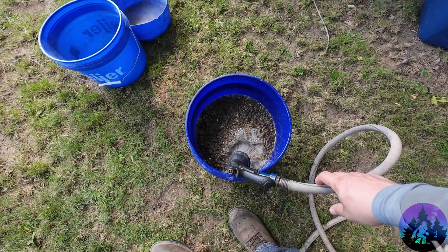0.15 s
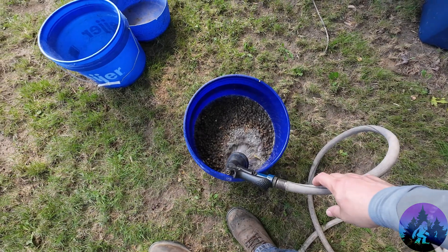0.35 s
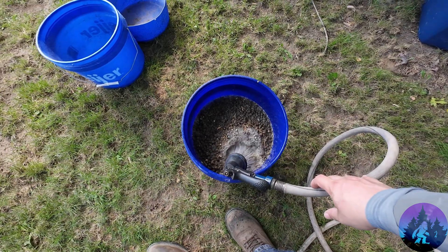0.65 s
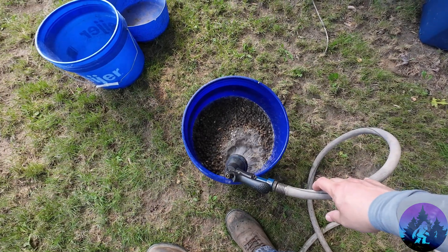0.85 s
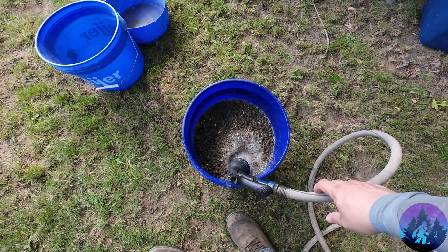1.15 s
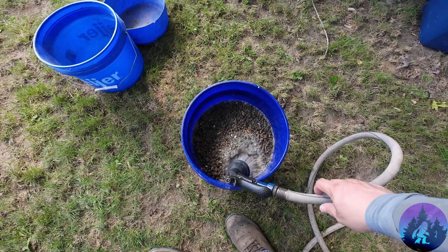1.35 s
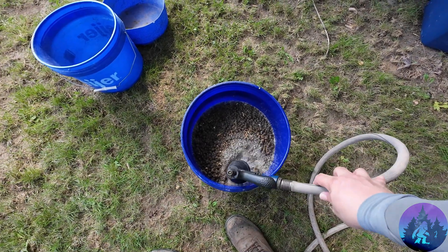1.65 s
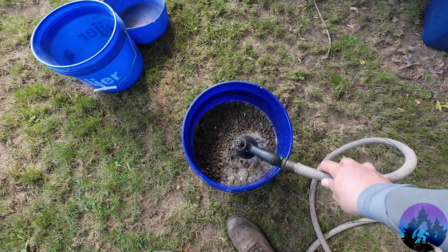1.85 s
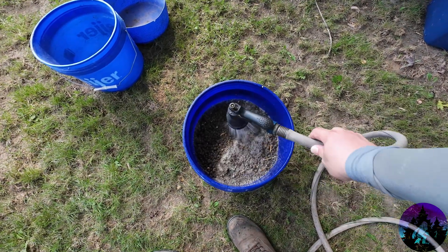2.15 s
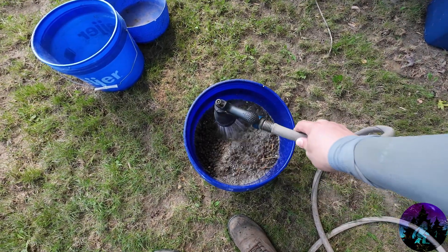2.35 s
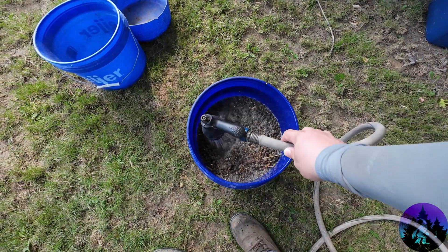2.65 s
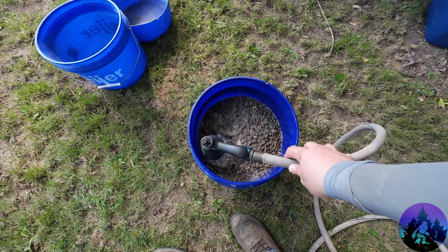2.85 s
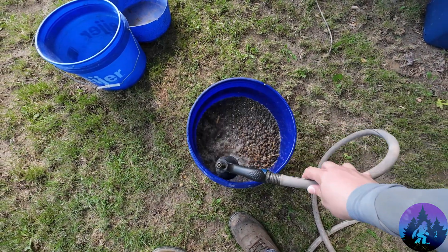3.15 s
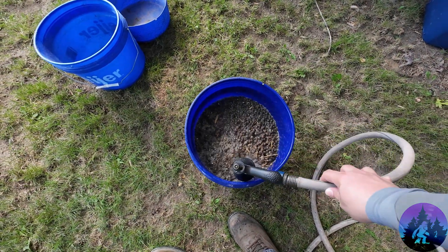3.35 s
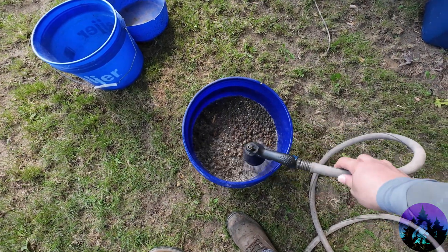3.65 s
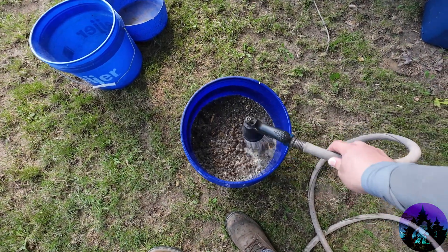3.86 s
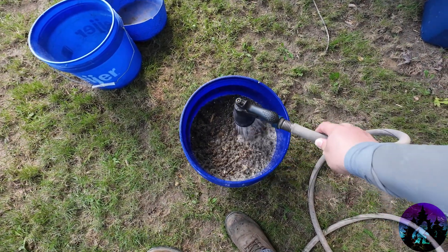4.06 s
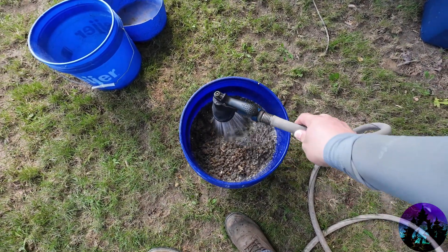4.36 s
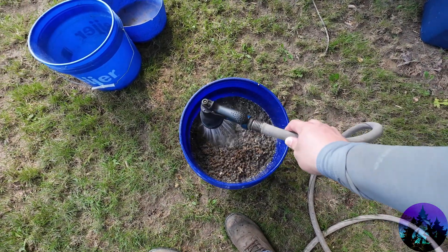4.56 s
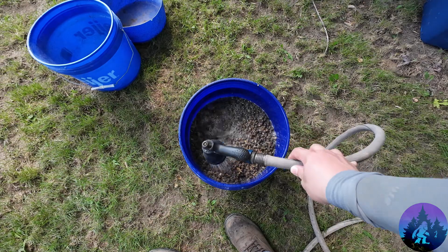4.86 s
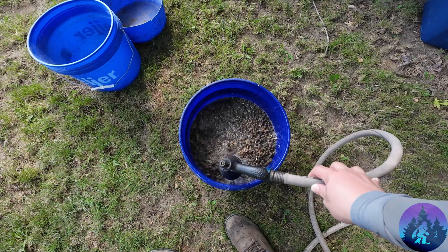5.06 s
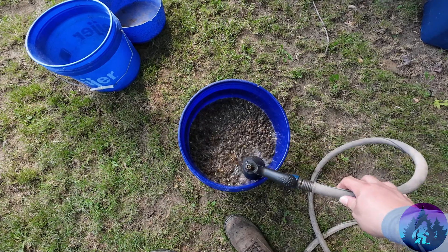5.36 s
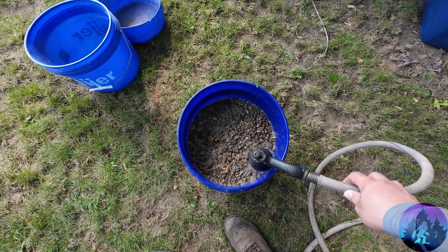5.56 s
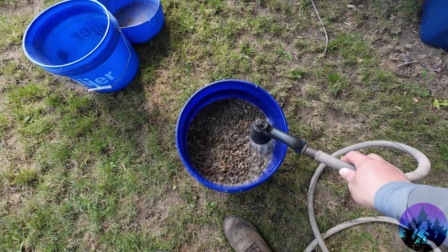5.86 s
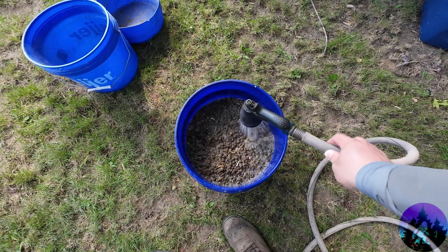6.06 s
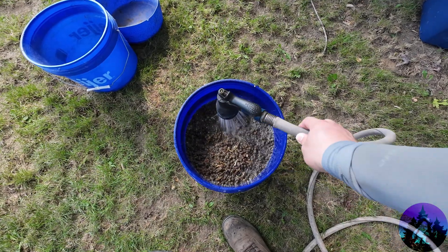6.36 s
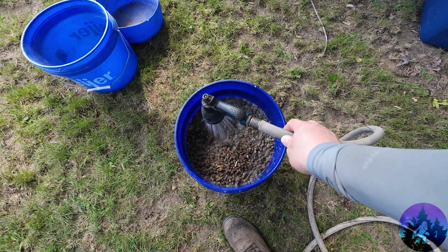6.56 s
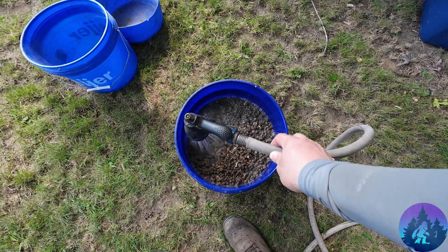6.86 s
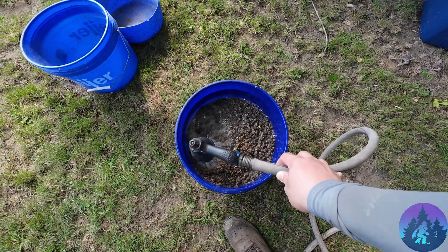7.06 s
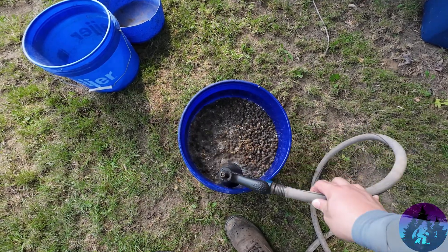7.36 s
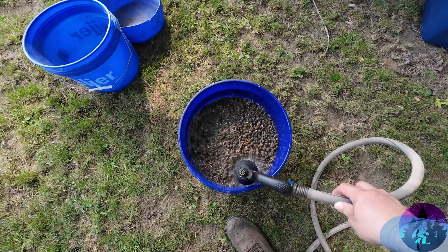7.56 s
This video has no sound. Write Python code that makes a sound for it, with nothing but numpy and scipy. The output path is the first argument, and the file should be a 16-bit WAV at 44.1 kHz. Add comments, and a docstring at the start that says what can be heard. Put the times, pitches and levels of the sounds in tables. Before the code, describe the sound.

From the start to the end, nearly eight seconds, a garden hose nozzle sprays water into a plastic bucket of wet manure, heard from close above, outdoors. A bright, sputtering hiss blends with dense spattering drops and lower churning. The spray swells and sinks gently about every three quarters of a second. The bucket adds a hollow ring that shifts as the nozzle circles, sounding less deep around 2.3, 4.2 and 6.3 seconds. Wind puffs on the microphone lightly at about 0.5 to 1.5 seconds and again near 2 and 3 seconds. From about 4 to 5.8 seconds it buffets harder, with low thumps jumping between left and right, strongest near 4.8 seconds. A few smaller gusts return between 6.6 and 7.5 seconds. A faint, steady distant rumble lies underneath.

```python
"""Hosing out a bucket

A garden hose nozzle is swept round inside a plastic bucket of wet manure on a lawn, heard from above.
The spray swells and sinks, hisses and splashes. Its drops make the air in the bucket ring, at pitches
whose strength depends on where the nozzle is. Wind buffets the microphone's two openings (ports)
separately, over a faint distant rumble."""
import sys
import numpy as np
from scipy import signal
from scipy.fft import rfft, irfft, next_fast_len
from scipy.io import wavfile
from scipy.ndimage import uniform_filter1d

SR = 44100
rng = np.random.default_rng(int(sys.argv[2]) if len(sys.argv) > 2 else 0)


def to_wav(sig):
    """Store sig (one row per channel, or 1-D mono) as 16-bit WAV at the path in sys.argv[1].

    Samples outside -1..1 are clipped; the rate is SR.
    """
    pcm = np.clip(np.atleast_2d(sig), -1, 1) * 32767
    pcm = np.round(pcm).astype(np.int16)
    wavfile.write(sys.argv[1], SR, pcm.T)  # frames by channels


N = 340452
TIME = np.arange(N) / SR
SIZE = next_fast_len(N)
HZ = np.maximum(np.arange(SIZE // 2 + 1) * SR / SIZE, 1)   # frequency of each point of a spectrum


def from_db(db):
    """Turn decibels into a factor to multiply by."""
    return 10 ** (np.asarray(db) / 20)


def rms_one(x):
    """Scale a sound to an average strength (rms) of 1."""
    return x / np.sqrt(np.mean(x ** 2) + 1e-20)


def in_time(rows):
    """Join (time, value) points with straight lines, one value per sample."""
    return np.interp(TIME, *np.transpose(rows))


def in_pitch(rows):
    """Spread each column after the first (frequency) over the whole spectrum."""
    hz, *columns = np.transpose(rows)
    return [np.interp(np.log(HZ), np.log(hz), column) for column in columns]


def colour(x, tone):
    """Shape the lows and highs of x by a (frequency, level) table; rms 1."""
    return rms_one(irfft(rfft(x, SIZE) * from_db(in_pitch(tone)[0]), SIZE)[:N])


def drift(rate_hz):
    """A smooth random wobble of rms 1; a higher rate wobbles faster."""
    step = 20   # samples between random values
    r = np.exp(-2 * np.pi * step * rate_hz / SR)
    slow = signal.lfilter([1], [1, -2 * r, r * r], rng.standard_normal(N // step + 3002))[3000:]
    return np.interp(np.arange(N) / step, np.arange(len(slow)), rms_one(slow))


def nozzle_place():
    """The nozzle circles the rim. far: 0 near wall to 1 far wall; left: -1 right wall to 1 left wall."""
    # path from the near wall, going by the right side: t/s, angle/turns
    path = [(0, 0.19), (.7, 0.064), (1.8, 0.16), (2.1, 0.28), (2.5, 0.71), (2.8, 0.71), (3.1, 0.81),
            (3.4, 0.88), (3.78, 1.18), (4.0, 1.29), (4.4, 1.31), (4.85, 1.74), (5.2, 1.84), (5.7, 2.21),
            (6.0, 2.28), (6.45, 2.35), (7.0, 2.75), (7.72, 2.88)]
    angle = 2 * np.pi * uniform_filter1d(in_time(path), SR // 8)
    far = np.clip(.5 - 0.97 * np.cos(angle), 0, 1)
    return far, -np.sin(angle)


def follow_spray(parts, far, left):
    """A level in dB for each part: it follows the spray's swell, a little late, and the nozzle's place."""
    # the spray swells about every three quarters of a second: t/s, level/dB
    loudness = [(0.0, -26.5), (0.1, -26.5), (0.45, -29.5), (0.64, -25.5), (0.79, -26.5), (1.22, -29),
                (1.46, -25.5), (1.93, -30.5), (2.22, -24.5), (2.38, -25.5), (2.77, -28.5), (2.97, -25.5),
                (3.44, -31.5), (3.76, -26.5), (4.24, -29), (4.45, -24.5), (4.69, -25), (4.99, -30),
                (5.2, -26.5), (5.33, -27), (5.55, -28.5), (5.75, -30), (5.9, -26), (6.12, -24.5),
                (6.53, -27.5), (6.79, -23), (7.33, -30), (7.62, -25.5), (7.72, -30)]
    swell_db = uniform_filter1d(in_time(loudness), SR // 12) + 27   # swings around zero
    levels = []
    for db, share, lag_s, far_db, left_db in parts:
        late_db = swell_db[np.clip(np.arange(N) - int(lag_s * SR), 0, N - 1)]
        levels.append(db + share * late_db + far_db * far + left_db * left)
    return np.array(levels)


def drops(per_s, spread_db):
    """A dense hail of tiny drop impacts of uneven size; rms 1."""
    sizes = from_db(spread_db * np.minimum(rng.exponential(1, N), 4)) * rng.standard_normal(N)
    return rms_one(sizes * (rng.random(N) < per_s / SR))


def sputter(x, low_hz, high_hz, bands, shared, own_db):
    """The spray sputters: all frequency bands flicker together, and each a little on its own."""
    spectrum, out = rfft(x, SIZE), 0
    place = np.clip(np.log(HZ / low_hz) / np.log(high_hz / low_hz), 0, 1) * (bands - 1)
    together_db = shared * (0.29 * drift(7.1) + 0.24 * drift(37))
    for k in range(bands):
        band = irfft(spectrum * np.clip(1 - abs(place - k), 0, 1), SIZE)[:N]
        out = out + band * from_db(together_db + own_db * drift(18.5))
    return rms_one(out)


def spray(hiss_db, spatter_db, splash_db, rings_db):
    """The jet hisses, its drops spatter and splash, and the water below churns."""
    # the jet, through the dip and peak of the microphone's housing: f/Hz, relative level/dB
    hiss_tone = [(7500, -40), (8500, -13), (9100, -8), (10100, -6), (11000, -9), (12250, -13.5),
                 (12600, -11), (12950, -2.5), (13400, -1), (14000, -2.5), (14500, -5), (15000, -8),
                 (15700, -12)]
    # bright spatter of drops: f/Hz, relative level/dB
    spatter_tone = [(2240, -32.5), (3800, -0.5), (4470, 0.5), (5300, -1), (6400, 0.5), (7080, -4),
                    (7900, 1.5), (8500, -4), (9300, -13)]
    # drops landing on the heap: f/Hz, relative level/dB
    splash_tone = [(1000, -53), (1600, -9), (2000, -4), (2900, 0), (4000, -4.5), (4600, -6), (6500, -19)]
    # water churning in the heap: f/Hz, relative level/dB
    churn_tone = [(100, -44), (170, -7), (260, -7.5), (400, -1.5), (535, -1), (680, 1.5), (870, 3),
                  (1250, 0.5), (1500, -5.5), (2200, -20.5)]
    hiss = colour(drops(40000, spread_db=2.5), hiss_tone)
    hiss = sputter(hiss, 11000, 15600, bands=7, shared=1.2, own_db=0.9)
    spatter = colour(drops(30000, spread_db=1.0), spatter_tone)
    spatter = sputter(spatter, 3680, 8560, bands=8, shared=.5, own_db=1.17)
    splash = colour(drops(18000, spread_db=2.0), splash_tone)
    splash = sputter(splash, 1580, 4050, bands=8, shared=1.0, own_db=1.4)
    churn = colour(drops(8000, spread_db=2.5), churn_tone)
    churn = sputter(churn, 195, 1200, bands=6, shared=0.2, own_db=2.5)
    churn_db = -39 + 0.53 * (rings_db.mean(axis=0) + 43.5)   # swells with the bucket's low ringing
    return (from_db(hiss_db + 1.47) * hiss + from_db(spatter_db + 1.06) * spatter
            + from_db(splash_db - 0.34) * splash + from_db(churn_db) * churn)


def ring(x, hz, width_hz):
    """Make x ring at one pitch; a narrower width rings longer; rms 1."""
    r = np.exp(-np.pi * width_hz / SR)
    return rms_one(signal.lfilter([1, 0, -1], [1, -2 * r * np.cos(2 * np.pi * hz / SR), r * r], x))


def low_ring_levels(far, left):
    """Levels in dB of the bucket's three low pitches; the lowest weakens as the bucket fills."""
    # lowest first: level/dB, share of the swell, lag/s, gain at far wall/dB, gain at left wall/dB
    ring_parts = [(-38.5, 1.54, 0.023, -8, -0.37), (-49, 1.8, 0.022, 9, -0.81),
                  (-35, 1.14, 0.017, -8, -0.85)]
    fade_db_per_s = .5
    rings_db = follow_spray(ring_parts, far, left)
    rings_db[0] -= fade_db_per_s * (TIME - N / SR / 2)
    return rings_db


def bucket(splash_db, rings_db, far):
    """Drops make the bucket's air ring, at each pitch as strongly as the nozzle's place allows."""
    # low pitches of the air: f/Hz, base width/Hz
    low_rings = [(375, 123), (850, 250), (1170, 420)]
    # further pitches, relative to the splash: f/Hz, width/Hz, level at near wall/dB, at far wall/dB
    other_rings = [(670, 44, -18, -35.5), (1761, 84, -18, -8.5), (1795, 83, -17.5, -6.5),
                   (2078, 250, -10, -6), (2366, 420, -6, -5.5), (3020, 140, -12, -23.5),
                   (3434, 99, -11.5, -9), (3773, 69, -15, -14.5), (4140, 100, -28, -13)]
    impacts, out = drops(15000, spread_db=0.9), 0
    for db, (hz, width_hz) in zip(rings_db, low_rings):
        once = ring(impacts, hz, 1.76 * width_hz)
        out = out + from_db(db) * ring(once, hz, 1.76 * width_hz)   # twice, for a steeper-sided peak
    for k, (hz, width_hz, near_db, far_db) in enumerate(other_rings):
        level_db = splash_db + near_db + far * (far_db - near_db) + 1.1 * drift(3.5)
        out = out + (-1) ** k * from_db(level_db) * ring(impacts, hz, width_hz)
    return out


def wall_echo(x, far):
    """The echo off the bucket wall partly cancels some pitches, which depend on the nozzle's place."""
    # weakened pitches: f at near wall/Hz, f at far wall/Hz, width/Hz, depth from 0 to 1
    dips = [(532, 560, 96, 0.26), (849, 1068, 110, 0.61), (1390, 1550, 113, 0.48), (1950, 2360, 140, 0.4),
            (4370, 4550, 300, 0.37)]
    at_near, at_far = x, x
    for near_hz, far_hz, width_hz, depth in dips:
        at_near = at_near - depth * signal.lfilter(*signal.iirpeak(near_hz, near_hz / width_hz, SR), at_near)
        at_far = at_far - depth * signal.lfilter(*signal.iirpeak(far_hz, far_hz / width_hz, SR), at_far)
    return at_near + far * (at_far - at_near)


def ports(x, far, left):
    """Left and right differ a little, by the housing's shadow, arrival time and scattered sound."""
    # f/Hz, base level of scatter/dB, left minus right/dB, left's lead/radians, share of the time gap
    port_contrast = [(200, -16, 0, 0, 0), (700, -19, .6, 0, 0), (1000, -23, .3, 0, 0), (1300, -70, 0, 0, 0),
                     (3600, -70, 0, 0, 0), (4200, -22, .3, 0, .4), (5000, -15, .9, .17, 1),
                     (5800, -14, 1.1, .33, 1), (6600, -17, .4, .19, .7), (7200, -30, 0, .05, .4),
                     (9000, -14, .7, .12, 1), (10000, -13, -1.5, .04, 1.1), (12500, -13, -1.7, 0, .9),
                     (13200, -14, -1.6, 0, .8), (14000, -13, .15, -.04, .8), (15300, -14, -.6, -.18, .7)]
    scatter_db, lean_db, phase, gap_share = in_pitch(port_contrast)
    spectrum = rfft(x, SIZE)
    housing = irfft(spectrum * (lean_db * np.log(10) / 40 + .5j * phase), SIZE)[:N]
    # arriving slightly early adds the wave's slope times the time gained
    gap_s = (3 + .75 * TIME) * 1e-6 * left
    slope = irfft(spectrum * gap_share * 2j * np.pi * HZ, SIZE)[:N]
    # many weak late echoes scramble the timing but leave the tone
    echoes = rfft(rng.standard_normal(4000) * np.exp(-np.arange(4000) / 1500), SIZE)
    scattered = irfft(spectrum * from_db(scatter_db) * echoes / abs(echoes), SIZE)[:N]
    # their paths keep changing as the spray flies, so the phase wanders
    scattered = np.real(signal.hilbert(scattered, SIZE)[:N] * np.exp(3j * drift(15)))
    side = housing + gap_s / 2 * slope + from_db(-2 + 6.6 * far) * scattered
    return np.array([x + side, x - side])


def distant_rumble():
    """A steady, far-off outdoor rumble with a faint hum."""
    # f/Hz, relative level/dB
    distant_tone = [(15, -30), (25, -10), (60, -5.5), (90, -1), (115, -13), (155, -36), (210, -2),
                    (300, -15), (400, -50)]
    return from_db(-51) * colour(rng.standard_normal(N), distant_tone)


def wind_power():
    """Power of rumble and flutter at each port: the breeze wanders; each puff rises, holds and falls."""
    # breeze on the ports: t/s, base level/dB
    breeze = [(0, -79), (.35, -76), (.45, -52), (.65, -48), (.85, -74), (1.0, -43), (1.46, -44),
              (1.52, -76), (1.8, -81), (1.95, -54), (3.0, -47.5), (3.35, -54), (3.8, -47), (4.0, -41),
              (4.55, -36.5), (4.65, -35), (5.4, -39), (5.5, -38), (5.9, -41), (6.2, -56), (6.5, -45),
              (6.9, -48), (7.1, -42), (7.72, -58)]
    # puffs of wind: t/s, hold/s, base level/dB, base lean to the left/dB, flutter against rumble/dB
    puffs = [(.43, .02, -40.5, -6, -8), (.54, .02, -31.5, 6, -18), (.97, .01, -36, 9, -14),
             (1.07, .08, -32, -1, -9), (1.24, .01, -34, -1, -16), (1.37, 0.022, -40, 4, -2),
             (1.44, 0.021, -33, 7, -12), (1.91, .01, -37.5, -14, -21), (2.06, 0.0091, -30.5, -28, -25),
             (2.21, .01, -42, -16, -12), (2.73, .01, -43, -14, -19), (2.86, .03, -33, -10, -27),
             (2.99, .02, -42, 13, -16), (3.57, 0.009, -41, -4, -21), (3.8, .03, -40, 1, -22),
             (3.91, 0.083, -28.5, -13, -20), (4.11, 0.022, -31.5, -9, -18), (4.164, 0.0044, -28.5, -4, 1),
             (4.23, 0.12, -40, 8, -14), (4.471, 0.03, -27.5, -9, -2), (4.62, .05, -26, 6, -22),
             (4.71, 0.067, -20.5, -6, -11.5), (4.87, 0.011, -19, -16, -2.5), (4.92, 0.076, -26, 2, -10),
             (5.01, .01, -26, 15, -9), (5.14, 0.025, -25.5, 14, -16), (5.22, .05, -32, 6, -18),
             (5.3, 0.078, -23.5, 0.5, -11.5), (5.48, .04, -37, -2, -14), (5.63, 0.11, -29, 8, -17),
             (5.76, 0.014, -27, 9, -5), (5.87, .01, -42, -9, -13), (5.98, .01, -36, -11, -9),
             (6.13, .01, -44, -1, -14), (6.58, 0.036, -31, -15, -20), (6.74, .015, -31, -18, -6),
             (7.01, 0.035, -37, 11, -25), (7.1, .03, -38.5, -9, -14), (7.2, .03, -41, 18, -25),
             (7.35, 0.029, -26, -16, -18), (7.4, 0.012, -30, -5.5, -2.5), (7.53, 0.015, -35, 8, -24)]
    rise_db_per_s, fall_db_per_s, strong_db = 380, 330, -33
    step = 64   # samples between computed points
    t = TIME[::step]
    start, hold, db, lean_db, flutter_db = np.transpose(puffs)[:, :, None]
    shape_db = -rise_db_per_s * np.maximum(start - t, 0) - fall_db_per_s * np.maximum(t - start - hold, 0)
    flutter_db = np.minimum(flutter_db, 0) + 0.6 * shape_db   # flutter comes and goes faster
    # one row for the breeze, then one for each puff
    level_db = np.vstack([in_time(breeze)[::step], db + shape_db])
    lean_db = np.vstack([2.8 * drift(6.6)[::step], lean_db + np.zeros_like(t)])
    flutter_db = np.vstack([np.full_like(t, -9), flutter_db])
    flutter_db += 0.63 * np.minimum(level_db - strong_db, 0)   # weak gusts flutter less
    port_share = np.array([1 / (1 + from_db(-2 * pull * lean_db)) for pull in (0.85, -1.25)])
    rumble = (port_share * from_db(2 * level_db)).sum(axis=1)
    flutter = (port_share * from_db(2 * (level_db + flutter_db))).sum(axis=1)
    return [[np.interp(TIME, t, port) for port in power] for power in (rumble, flutter)]


def wind():
    """Lumpy swirls of air, separate at each port; the flutter of strong gusts is louder on the right."""
    # a light gust: f/Hz, relative level/dB
    rumble_tone = [(18, -4.5), (30, 7.5), (55, 4), (90, -0.5), (140, -16), (250, -60), (500, -80)]
    # what strong gusts add: f/Hz, relative level/dB
    flutter_tone = [(60, -14), (100, -2), (150, 2), (230, -6.5), (350, -15), (600, -28), (1000, -90)]
    rumble_power, flutter_power = wind_power()
    out = np.zeros((2, N))
    for port, bias_db in enumerate([-2.5, 1.5]):
        lumps = from_db(2.0 * drift(16.0))
        rumble = colour(rng.standard_normal(N) * lumps, rumble_tone)
        flutter = colour(rng.standard_normal(N) * lumps * from_db(4 * drift(36)), flutter_tone)
        out[port] = np.sqrt(rumble_power[port]) * rumble
        out[port] += from_db(bias_db) * np.sqrt(flutter_power[port]) * flutter
    return from_db(7) * out


def buffets():
    """Each buffet is a sharp push of air that dies away in about a cycle and a half."""
    # t/s, base level/dB, f/Hz, left minus right/dB
    pushes = [(0.423, -24, 83.4, -12), (0.52, -35, 51.1, 2.0), (1.065, -28, 59.2, -3),
              (1.363, -26, 91.5, -5), (2.186, -32, 72.7, -12), (3.916, -21, 62, -21),
              (4.12, -20.5, 87, -11), (4.246, -22, 51.5, 14), (4.343, -27, 51.1, 11.5),
              (4.468, -27, 78.1, -12.0), (4.651, -12, 50.7, -14), (4.854, -6, 52.7, 8),
              (4.924, -24, 64.6, 3.5), (5.286, -12, 51.1, 8), (5.546, -19, 75.4, 3),
              (5.679, -16, 59.2, 6.0), (6.707, -31, 83.4, -21.0), (6.746, -29, 51.1, -16),
              (7.116, -27, 67.3, -21.5), (7.194, -19.5, 64.6, 22), (7.29, -20, 68, 20)]
    out = np.zeros((2, N))
    for (start, db, hz, lean_db), sign in zip(pushes, rng.choice([-1, 1], len(pushes))):
        cycles = np.arange(int(2.5 * SR / hz)) * hz / SR
        push = sign * np.sin(2 * np.pi * cycles) * 4 * cycles * np.exp(-2.2 * cycles)
        port_gains = from_db(db - 4 + np.array([[.5], [-.5]]) * lean_db)
        at = round(start * SR)
        out[:, at:at + len(push)] += (port_gains * push)[:, :N - at]
    return out


def scene():
    """Water, wind and distant rumble together at the two ports."""
    # hiss, spatter, splash: base level/dB, share of the swell, lag/s, gain at far wall/dB, at left wall/dB
    spray_parts = [(-27, 1, .003, 0.8, 0.03), (-31, 1, 0.012, 1.1, -0.15), (-28.6, 0.8, 0.02, -0.16, 0.13)]
    far, left = nozzle_place()
    hiss_db, spatter_db, splash_db = follow_spray(spray_parts, far, left)
    rings_db = low_ring_levels(far, left)
    distant = distant_rumble()
    gusts = .45 * np.tanh((wind() + buffets()) / .45)   # the hardest gusts flatten against the port mesh
    water = spray(hiss_db, spatter_db, splash_db, rings_db) + bucket(splash_db, rings_db, far)
    return ports(wall_echo(water, far), far, left) + gusts + distant


def record(dry):
    """Cut off the very highest treble."""
    cutoff_hz = 15750
    return signal.sosfilt(signal.ellip(14, .5, 80, cutoff_hz, fs=SR, output="sos"), dry)


dry = scene()
out = record(dry)
to_wav(out)
```